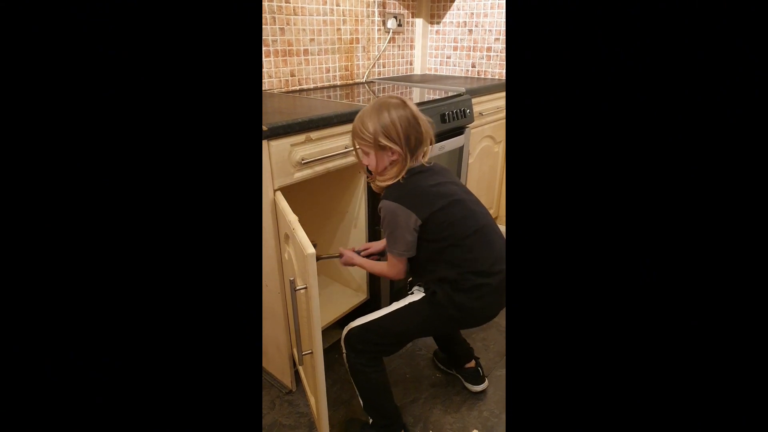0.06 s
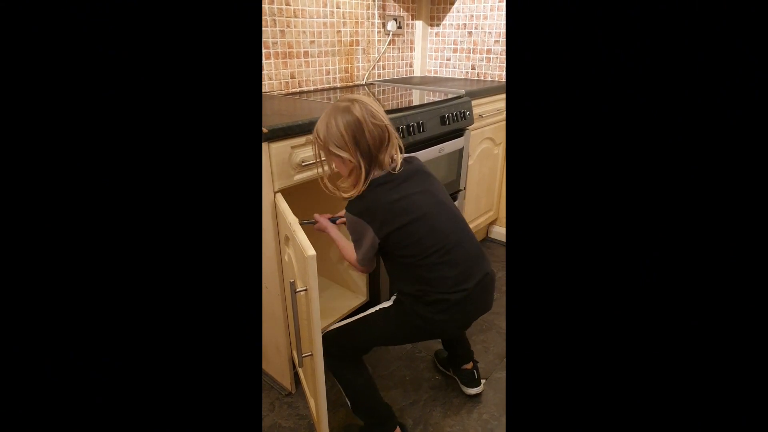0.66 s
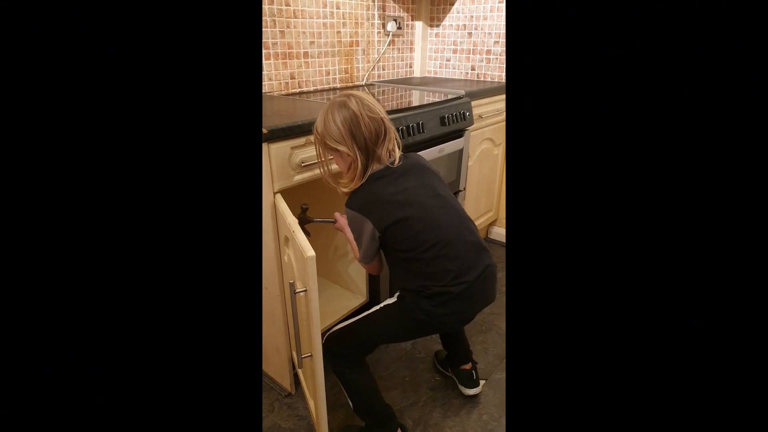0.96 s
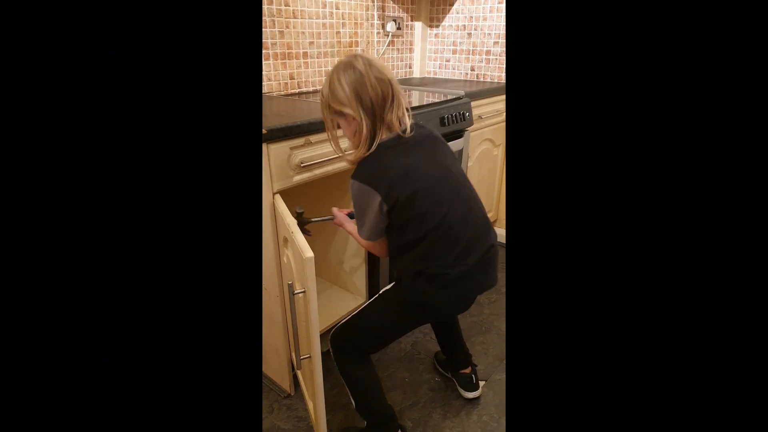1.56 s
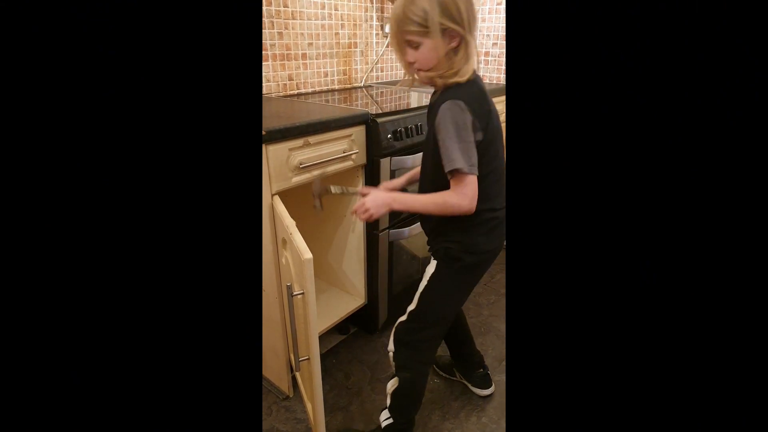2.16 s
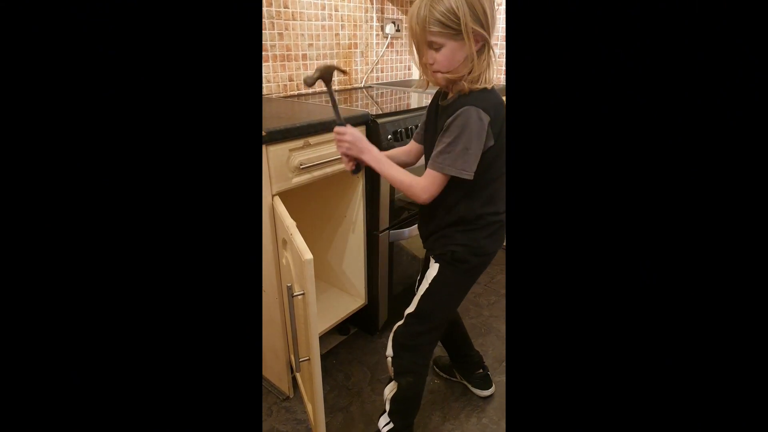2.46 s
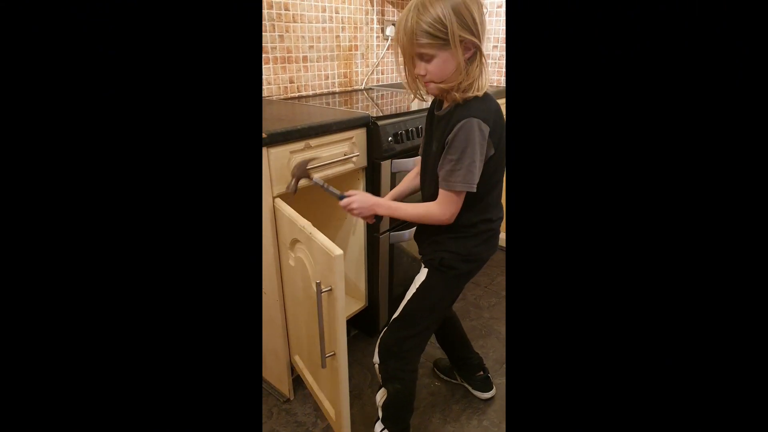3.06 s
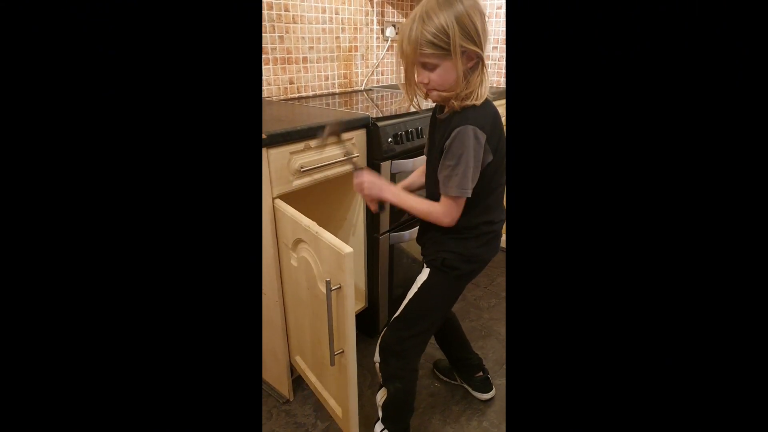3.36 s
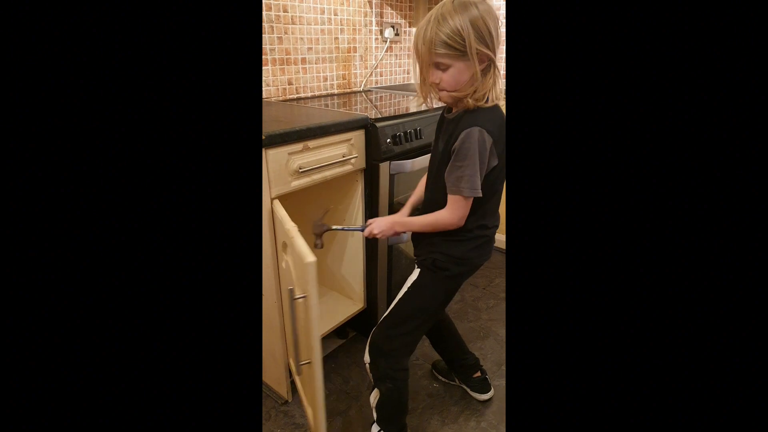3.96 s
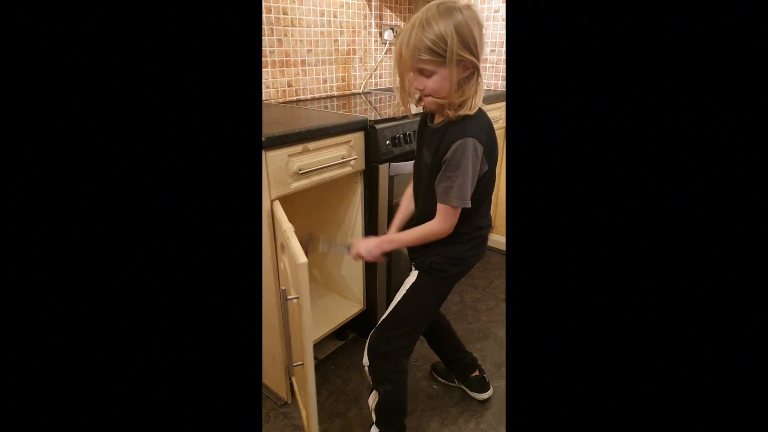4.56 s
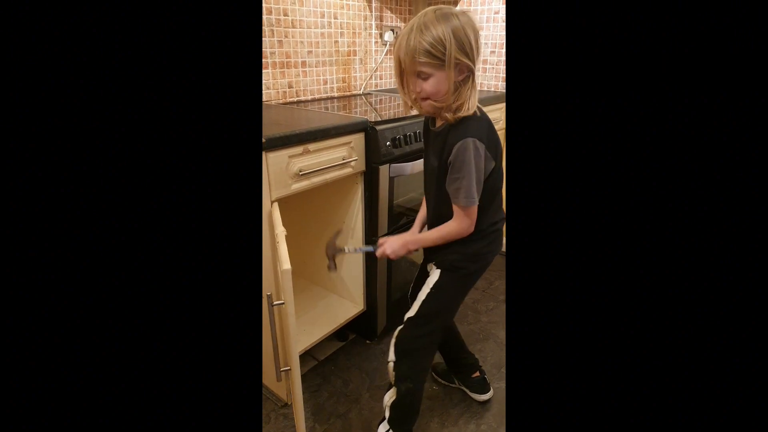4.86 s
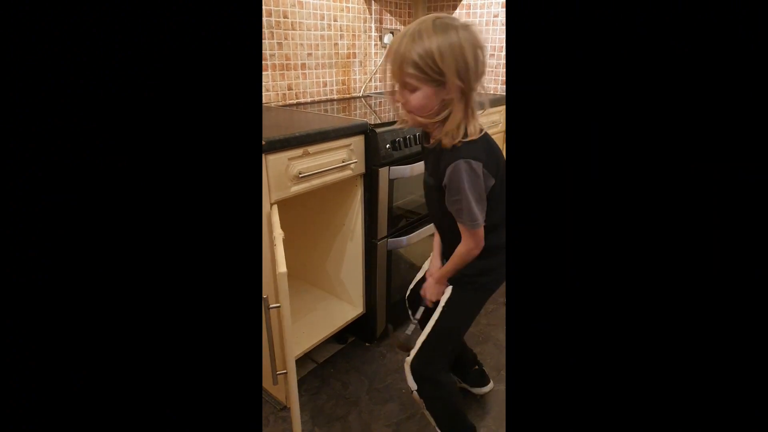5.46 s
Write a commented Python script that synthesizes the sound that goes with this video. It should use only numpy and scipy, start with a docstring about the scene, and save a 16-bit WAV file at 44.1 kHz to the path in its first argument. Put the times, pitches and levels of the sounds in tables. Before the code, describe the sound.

A hammer pounds a wooden cupboard in a small, hard-walled kitchen, heard from inside the room and a little brighter on the right. Each blow is a loud crack with a hollow wooden boom and a slight rattle, fading within about half a second. The sound opens on the ring of a blow just struck, and two more land at 0.6 and 1.2 seconds. In the pause, clothes swish faintly and the hammer gives two light ticks around 2 seconds. Blows with a sharp steel click come at 2.7 and 3.5 seconds, followed by others at 3.9, 4.6 and a slightly softer one at 5.3 seconds. A loose door hinge gives thin, faint squeaks between 3.1 and 3.7 seconds and again just after 5 seconds, along with a couple of small knocks. A very faint low hum lies underneath.

```python
"""Hammer blows crack and boom on a wooden cupboard in a small, hard-walled kitchen.
Each blow of the claw hammer cracks on a panel and sets the boards ringing and the carcass booming,
and the room rings on. The stereo microphone stands in the same room, its right side nearer the blows.
Between them: faint ticks, a squeaking hinge, rustling clothes and a low hum."""
import sys
import numpy as np
from scipy import signal
from scipy.fft import rfft, irfft
from scipy.io import wavfile
from scipy.ndimage import uniform_filter1d

SR = 44100
rng = np.random.default_rng(int(sys.argv[2]) if len(sys.argv) > 2 else 0)


def generate_wav(signal):
    """Clip the signal to [-1, 1] and save it as 16-bit WAV at the path in sys.argv[1]."""
    frames = np.transpose(np.atleast_2d(signal))
    scaled = np.clip(frames, -1, 1) * 32767
    pcm = np.round(scaled).astype(np.int16)
    wavfile.write(sys.argv[1], SR, pcm)


N = 251370
RING = 2 ** 15  # samples given to one event and its tail

# how alike the room sounds on both sides of the microphone: f/Hz, correlation (capped at 1 in use)
LIKENESS = [(70, 1.4), (140, 1), (290, 1), (640, 0.23), (1400, -0.11), (3000, 0)]
# how fast the cupboard's ringing builds: f/Hz, time constant/s
SWELL = [(80, 0.034), (300, 0.032), (800, 0.0078), (3000, 0.00042), (10000, 0.0011)]


def amp(db):
    return 10 ** (np.asarray(db) / 20)


def unit_rms(x):
    return x / np.sqrt(np.mean(x ** 2) + 1e-20)


def curve(points, hz):
    """Rows of (f/Hz, value) joined by lines on a log-frequency axis."""
    f, value = np.transpose(points)
    return np.interp(np.log(hz + 1), np.log(f + 1), value)


def bump(hz, centre, octaves):
    """A bell curve of height 1 on the octave scale."""
    return np.exp(-.5 * (np.log2((hz + 1) / centre) / octaves) ** 2)


def peak(hz, centre, octaves):
    """A resonance curve of height 1: a narrow top on wide skirts."""
    return 1 / (1 + (np.log2((hz + 1) / centre) / octaves) ** 2)


def shelf(hz, corner_hz):
    """A smooth step from 0 below the corner to 1 above it."""
    return 1 - 1 / (1 + (hz / corner_hz) ** 4)


def highpass(x, hz, order=1):
    return signal.sosfilt(signal.butter(order, hz, "high", fs=SR, output="sos"), x)


def colour(x, db_at, size=4096):
    """Causal filter with the gain db_at(Hz): nothing sounds before the hit."""
    log_gain = np.log(amp(db_at(abs(np.fft.fftfreq(size, 1 / SR)))))
    taps = np.fft.ifft(np.exp(np.conj(signal.hilbert(log_gain)))).real
    return signal.fftconvolve(x, taps[None], axes=1)[:, :x.shape[1]]


def add(mix, start_s, sound):
    """Lays a sound into the mix, cutting what falls outside."""
    start = round(start_s * SR)
    sound = sound[:, max(-start, 0):]
    part = mix[:, max(start, 0):][:, :sound.shape[1]]
    part += sound[:, :part.shape[1]]


def jitter(size, span):
    """Random wavering of unit RMS, smoothed over span samples."""
    return unit_rms(uniform_filter1d(rng.standard_normal(size), size=span))


def correlation(hz):
    return np.clip(curve(LIKENESS, hz), -1, 1)


def diffuse(size):
    """White noise from all around the microphone: left and right alike in the bass, not in the treble."""
    left, other = rfft(rng.standard_normal((2, size)))
    same = correlation(np.fft.rfftfreq(size, 1 / SR))
    return irfft([left, same * left + np.sqrt(1 - same ** 2) * other], size)


def room_tone(air_db=-70, hum_hz=48.8, hum_db=-68, waver=0.73):
    """The kitchen's still air and a low hum that wavers."""
    # spectrum of the air: f/Hz, level/dB
    air_spectrum = [(20, -29.5), (33, -25.5), (55, -0.5), (100, -12), (200, -21.5), (500, -21.5),
                    (1000, -24), (2000, -34), (5000, -43.5), (8000, -53), (16000, -55.5)]
    t = np.arange(N) / SR
    drift_hz = rng.uniform(0.76, 1.8, size=12)
    drift = unit_rms(sum(np.sin(2 * np.pi * (f * t + rng.random())) for f in drift_hz))
    hum = unit_rms(np.sin(2 * np.pi * hum_hz * t) * (1 + waver * drift))
    air = unit_rms(colour(diffuse(N), lambda hz: curve(air_spectrum, hz)))
    return amp(air_db) * air + amp(hum_db) * hum


def fabric(size, rub_db, grain_db=1.5, rub_below_hz=2400):
    """Fabric slides in small uneven catches; heavier rubbing adds a duller body."""
    # spectrum of sliding cloth: f/Hz, level/dB
    cloth_spectrum = [(200, -3.5), (700, -2.5), (1500, -8), (2600, -7), (4200, -1.5), (6500, -14),
                      (8000, -23), (15000, -29.5)]
    catches = jitter(size, span=500)
    hiss = unit_rms(colour(diffuse(size), lambda hz: curve(cloth_spectrum, hz)))
    body = signal.sosfiltfilt(signal.butter(2, rub_below_hz, fs=SR, output="sos"), hiss)
    return (hiss + (amp(rub_db) - 1) * body) * amp(grain_db * catches)


def clothes(stir_db=-84.5, fastest_share=0.37):
    """Clothes swish as the body straightens and turns, over a faint constant stir."""
    # movements: t/s, length/s, level/dB, rubbing below the treble/dB
    swishes = [(-.15, 0.78, -80.5, 22), (1.749, 0.21, -60.5, -4), (2.159, 0.24, -64.5, 1.5),
               (2.221, 0.45, -70.5, 5.5), (2.997, 0.85, -78, 9.5)]
    t = np.arange(RING) / SR
    out = amp(stir_db) * fabric(N, rub_db=6)
    for start, length, db, rub_db in swishes:
        speed = np.interp(t / length, [0, fastest_share, 1], [0, 1, 0])
        add(out, start, amp(db) * speed * fabric(RING, rub_db))
    return out


def squeak(length, start_hz, end_hz, db, room_t60=0.53, direct=0.33, roughness=0.035):
    """A hinge sticks and slips: a thin, rough whistle, heard mostly by way of the walls."""
    t = np.arange(RING) / SR
    along = np.clip(t / length, 0, 1)
    hz = (start_hz + (end_hz - start_hz) * along) * (1 + roughness * jitter(RING, span=100))
    whistle = np.sin(2 * np.pi * np.cumsum(hz) / SR) * np.sqrt(abs(np.sin(np.pi * along)))
    room = diffuse(RING) * amp(-60 * t / room_t60)
    echoes = signal.fftconvolve(whistle[None], room / np.linalg.norm(room[0]), axes=1)[:, :RING]
    return amp(db) * (direct * whistle + echoes)


def tick(db, body_db, t60=0.0038, room_db=-14, room_t60=0.73):
    """A light knock as the hammer is shifted, and its faint echo in the kitchen."""
    # spectra of the knock's sharp edge and low body: f/Hz, level/dB
    edge_spectrum = [(300, -32), (1500, -13.5), (3000, -1.5), (5200, -1), (7500, -22.5), (15000, -23)]
    body_spectrum = [(100, -11.5), (600, 14), (1000, -2.5), (1600, 5.5), (3000, -9.5), (8000, -37)]
    t = np.arange(RING) / SR
    knock = diffuse(RING) * (amp(-60 * t / t60) + amp(room_db - 60 * t / room_t60))
    edge = colour(knock, lambda hz: curve(edge_spectrum, hz))
    body = colour(knock, lambda hz: curve(body_spectrum, hz) + body_db)
    return amp(db) * (edge + body)


def ring_out(t, swell, hold, t60):
    """Ringing builds up, stays level briefly, as if limited, then dies away."""
    return (1 - np.exp(-t / swell)) * amp(-60 * (np.hypot(t, hold) - hold) / t60)


def carcass(t, hold, uneven_db=3.5, wander=0.0038):
    """The carcass booms in modes that waver with its loose joints; only high ones differ left to right."""
    # modes of the cupboard standing in the room: f/Hz, level/dB, t60/s
    modes = [(54, -38.5, 0.79), (81.7, -35, 0.41), (104.33, -22, 0.32), (136, -27, 0.18), (158.7, -20, .45),
             (187.2, -27, 0.6), (226.4, -28, 0.4), (266.9, -27.5, .53), (294.5, -29.5, 0.5),
             (326.1, -22.5, 0.41), (341.6, -27, 0.41), (370, -33, .43), (453.3, -26.5, 0.41),
             (552, -30, 0.41), (661.6, -35.5, 0.49), (718.4, -29.5, .42), (816, -33.5, 0.11),
             (901, -31, 0.47), (976, -38.5, .42), (1478, -33, 0.38), (2454, -35.5, 0.44)]
    out = np.zeros((2, RING))
    for hz, db, t60 in modes:
        right_phase = np.arccos(correlation(hz)) * rng.choice([-1, 1])
        phase = 2 * np.pi * rng.random() + np.array([[0], [right_phase]])
        pitch = hz * (1 + wander * jitter(RING, span=900))
        level = amp(db + uneven_db * rng.standard_normal())
        envelope = ring_out(t, curve(SWELL, hz), hold, t60)
        out += level * np.sin(2 * np.pi * np.cumsum(pitch) / SR + phase) * envelope
    return out


def boards(t, hold, db=-1.5, bands=10):
    """Dense panel modes and room echoes, each band building and dying at its own speed."""
    # decay of the ringing in the kitchen: f/Hz, t60/s
    decay = [(70, 0.65), (250, 0.36), (700, 0.41), (2000, 0.42), (4500, 0.38), (7000, 0.36), (14000, 0.34)]
    field, hz = rfft(diffuse(RING)), np.fft.rfftfreq(RING, 1 / SR)
    centres_hz = np.geomspace(70, 14000, bands)
    out = np.zeros((2, RING))
    for centre, one_band in zip(centres_hz, np.eye(bands)):
        band = irfft(field * curve(np.c_[centres_hz, one_band], hz), RING)
        out += band * ring_out(t, curve(SWELL, centre), hold, curve(decay, centre))
    return amp(db) * out


def chatter(t, hold, per_s=130, db=-7.5, t60=0.011, size=1024):
    """Loose joints slap against each other just after the blow."""
    contacts = (rng.random(RING) < per_s / SR) * rng.uniform(0.48, 1, RING)
    contacts *= ring_out(t, swell=0.004, hold=hold, t60=0.2)
    slap = highpass(rng.standard_normal((2, size)) * amp(-60 * t[:size] / t60), hz=900)
    return amp(db) * signal.fftconvolve(contacts[None], slap, axes=1)[:, :RING]


def panel_response(ripple_db=2.6, spacing_hz=80):
    """A panel's chance peaks and dips, shallower in the bass: dB as a function of Hz."""
    grid_hz = np.arange(0, SR / 2, spacing_hz)
    heights = ripple_db * rng.standard_normal(len(grid_hz)) * np.clip(grid_hz / 800, 0, 1)
    return lambda hz: np.interp(hz, grid_hz, heights)


def ping(t, hz, db=-9, t60=0.033, swell_s=0.004):
    """The spot under the hammer swells and rings briefly at its own pitch."""
    phase = np.array([[0], [np.arccos(correlation(hz))]])
    envelope = (1 - np.exp(-(t / swell_s) ** 2)) * amp(-60 * t / t60)
    return amp(db) * np.sin(2 * np.pi * hz * t + phase) * envelope


def crack(t, crack_db, click_db, t60=0.031, click_t60=0.0084, size=4096):
    """Steel meets wood: the click reaches the microphone directly, the wood's burst by three paths."""
    # straight, then off the door, floor and tiles: delay/s, left level/dB, right level/dB
    paths = [(.0005, -13, -7), (.0038, -4.5, 0), (.008, -9.5, -2.5)]
    burst, click = rng.standard_normal((2, size))
    burst = highpass(burst * amp(-60 * t[:size] / t60), hz=550)
    click = highpass(click * amp(-60 * t[:size] / click_t60), hz=4000, order=2)
    out = np.zeros((2, RING))
    add(out, paths[0][0], amp(click_db) * np.array([np.roll(click, 8), click]))  # right side is nearer
    for delay, *side_db in paths:
        for side, lag in enumerate(rng.uniform(0, 0.00096, 2)):
            add(out[side:side + 1], delay + lag, amp(crack_db + side_db[side]) * burst[None])
    return out


def blow(strength_db, hold, thud_db, bright_db, click_db, hollow_db, low_hz, low_db, high_hz, high_db,
         hollow_hz=324, tint_share=0.55):
    """One hammer blow sounds the boards and the hollow carcass, coloured by the spot where it lands."""
    # spectrum of the boards' dense ringing: f/Hz, level/dB
    wood_spectrum = [(25, -25.5), (60, -5), (150, 4.5), (240, 1.5), (330, -1.5), (700, -3), (1150, -7.5),
                     (1700, -5), (2800, -9), (3600, -10), (4900, -12.5), (6300, -23.5), (7900, -36),
                     (11000, -32), (15500, -45.5)]
    t = np.arange(RING) / SR
    crack_db = 4 - 116.5 * hold  # longer holds have a softer crack
    impact = crack(t, crack_db, click_db)
    impact += amp(low_db) * ping(t, low_hz) + amp(high_db) * ping(t, high_hz)
    panel = panel_response()
    ringing = colour(boards(t, hold) + chatter(t, hold), panel)
    wood = colour(impact + ringing, lambda hz: curve(wood_spectrum, hz))
    boom = colour(carcass(t, hold), lambda hz: hollow_db * bump(hz, hollow_hz, octaves=0.15))

    def spot_db(hz):
        """The spot sets bass and treble, and its two pitches tint the long ringing."""
        tone = thud_db * (1 - shelf(hz, corner_hz=240)) + bright_db * shelf(hz, corner_hz=4100)
        tint = low_db * peak(hz, low_hz, octaves=0.41) + high_db * peak(hz, high_hz, octaves=0.17)
        return tone + tint_share * tint

    return amp(strength_db) * colour(wood + boom, spot_db)


def scene():
    """Blows, ticks and squeaks, brighter on the microphone's right, over the quiet kitchen."""
    # hinges of the loose door: t/s, length/s, start f/Hz, end f/Hz, level/dB
    squeaks = [(3.12, 0.2, 4000, 3570, -67.5), (3.24, 0.22, 3280, 2855, -66.5),
               (3.68, 0.19, 3463, 3026, -50.5), (4.32, 0.28, 1012, 990, -68.5),
               (5.062, 0.094, 3970, 3520, -57.5), (5.115, 0.092, 3484, 2660, -57),
               (5.245, 0.026, 4520, 4440, -48)]
    # small knocks of the hammer: t/s, level/dB, low body/dB
    ticks = [(1.917, -39.5, -24), (2.036, -43.5, -11), (3.385, -51, -10), (5.089, -45, -27),
             (5.211, -37, 2.5)]
    # hammer blows: t/s, level/dB, hold/s, thud/dB, brightness/dB, steel click/dB, hollow boom/dB,
    # then the struck spot's low ring f/Hz, level/dB and high ring f/Hz, level/dB
    blows = [(-.12, -0.5, 0.013, -8, -2, 0, -9, 677, -2, 1420, 22.5),
             (.557, 3, 0.036, 0.5, 0, -8.5, -8, 170, 2.5, 2420, 6.5),
             (1.215, .5, 0.09, 3, .3, -10.5, 1.5, 754, 2, 4730, 8),
             (2.685, 1.5, 0.04, -3.5, 1, 12.5, 1, 698, 10, 1892, 4),
             (3.487, -0.96, 0.048, -1.5, -4, 9, 10, 540, 5.5, 1517, 12),
             (3.905, -1.33, 0.12, 1, 2, -6, 6, 280, 3.5, 4540, 10),
             (4.589, -0.5, 0.075, -7.5, -2, -3.5, 5.5, 790, 3.5, 2870, 13),
             (5.307, -3.5, 0.015, -3.5, -4, -22, 4.5, 655, 6, 2740, 10)]
    # balance at the microphone: f/Hz, left minus right/dB
    balance = [(100, -1), (400, -2.5), (1100, -1), (1800, -3.5), (2700, -6), (3400, -7.5), (4600, -12.5),
               (6400, -3.5), (9000, -3.5)]
    events = np.zeros((2, N))
    for table, source in (blows, blow), (ticks, tick), (squeaks, squeak):
        for start, *row in table:
            add(events, start, source(*row))
    events[:1] = colour(events[:1], lambda hz: curve(balance, hz))
    # keep the summed power of both sides the same at every pitch
    events = colour(events, lambda hz: -10 * np.log10((1 + amp(curve(balance, hz)) ** 2) / 2))
    return events + clothes() + room_tone()


def record(dry, fade_samples=130, top_hz=16200):
    """The sound eases in over its first few milliseconds; the recorder rounds off the loudest peaks and cuts
    the highest treble."""
    faded = dry * np.sin(np.pi / 2 * np.minimum(np.arange(N) / fade_samples, 1)) ** 2
    rounded = faded / (1 + faded ** 4) ** (1 / 4)
    lowpass = signal.firwin(511, top_hz, window=("kaiser", 9), fs=SR)
    return signal.oaconvolve(rounded, lowpass[None], "same")


dry = scene()
out = record(dry)
generate_wav(out)
```